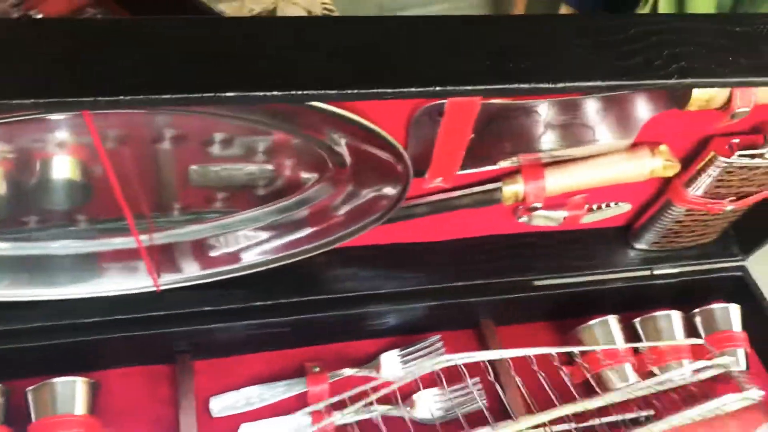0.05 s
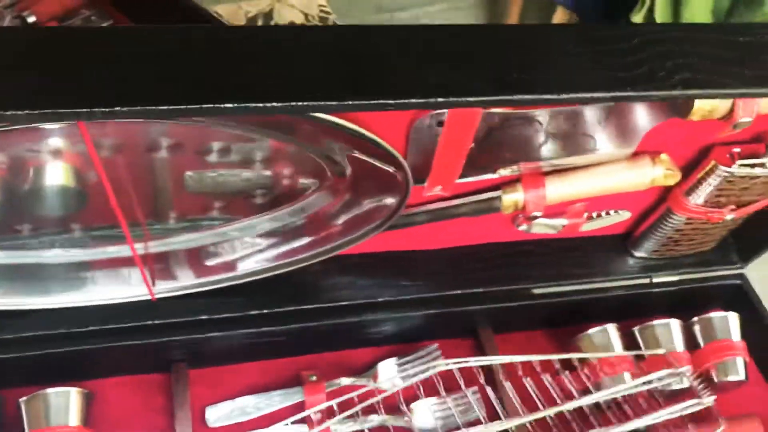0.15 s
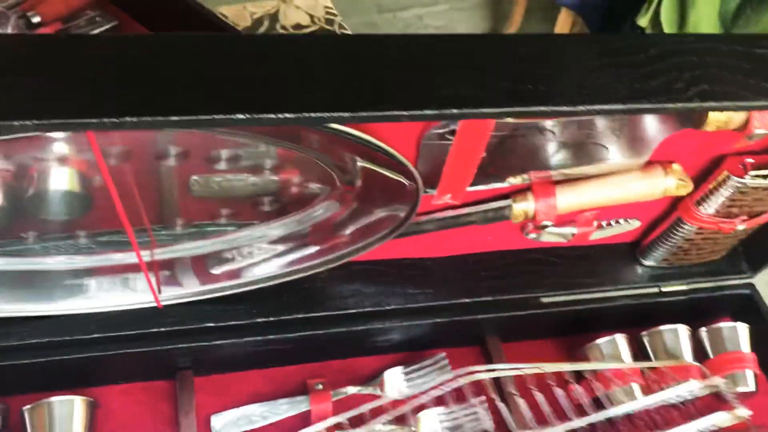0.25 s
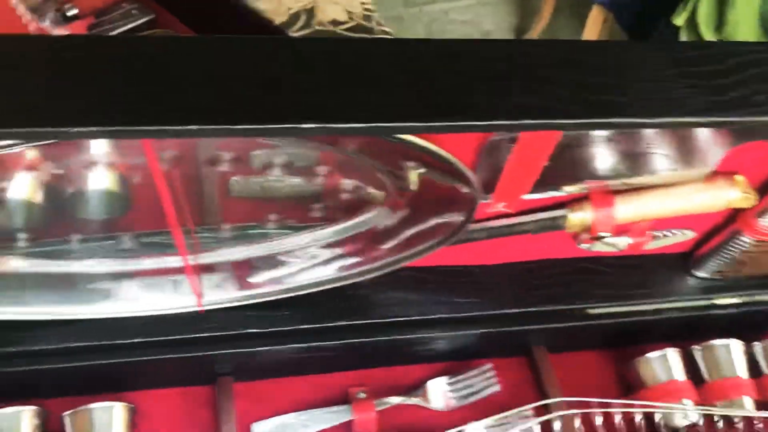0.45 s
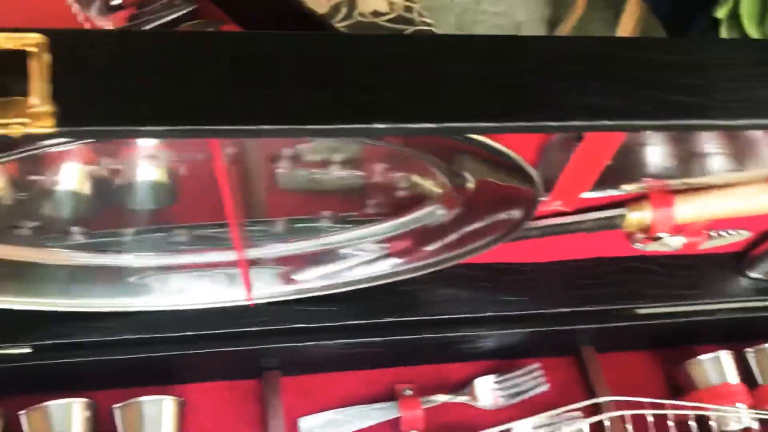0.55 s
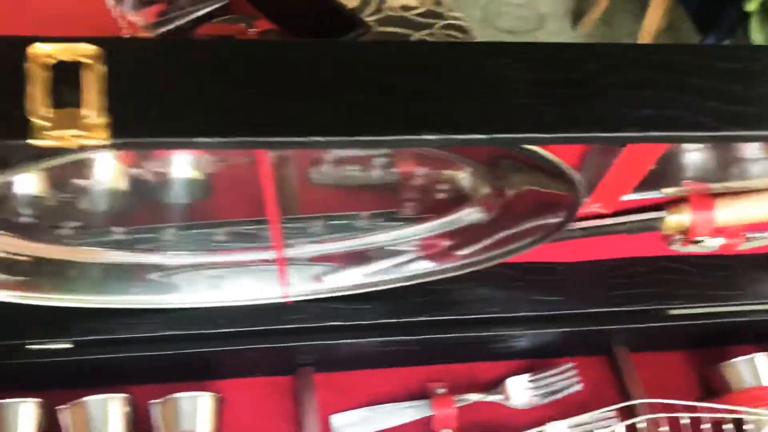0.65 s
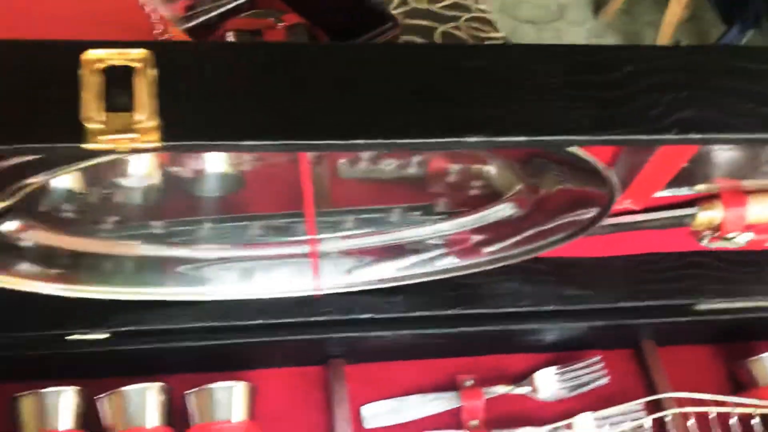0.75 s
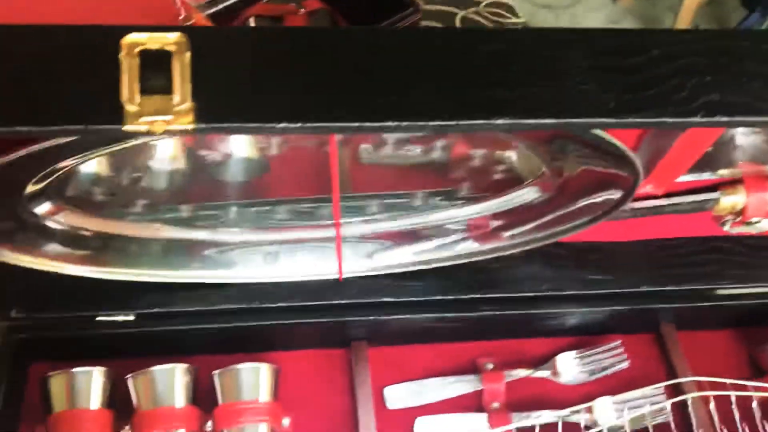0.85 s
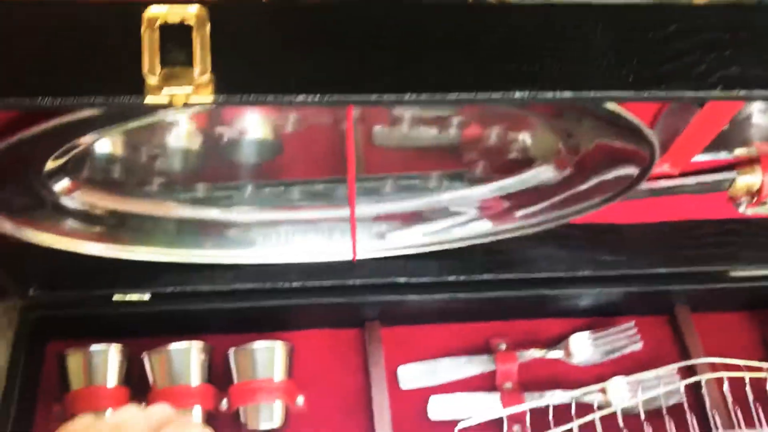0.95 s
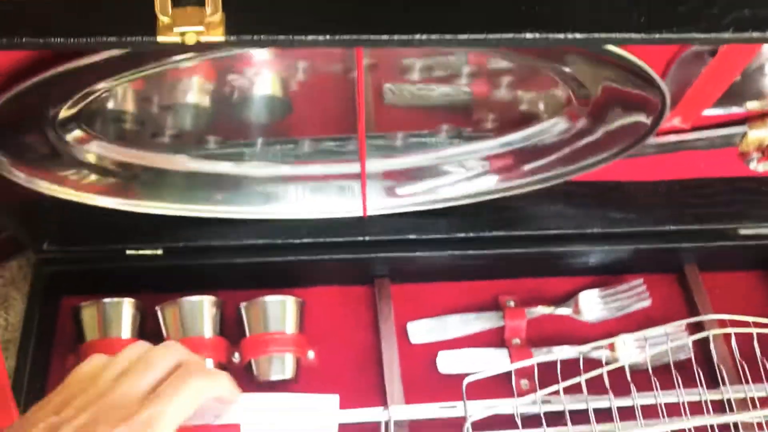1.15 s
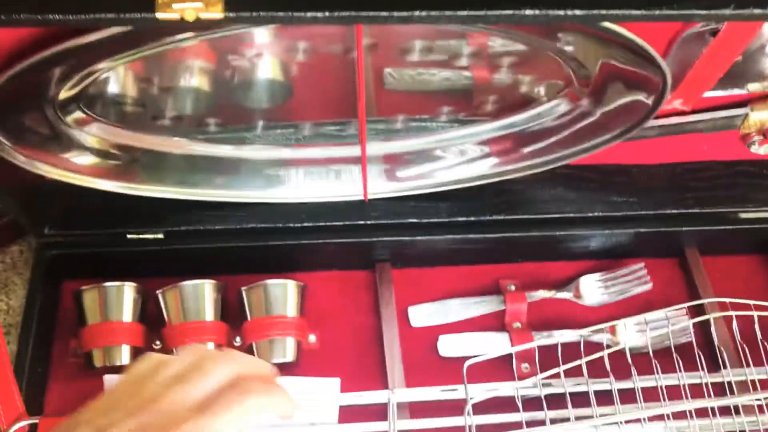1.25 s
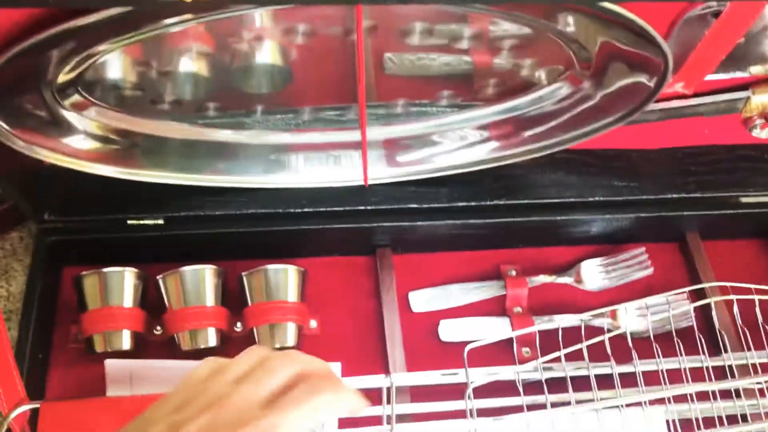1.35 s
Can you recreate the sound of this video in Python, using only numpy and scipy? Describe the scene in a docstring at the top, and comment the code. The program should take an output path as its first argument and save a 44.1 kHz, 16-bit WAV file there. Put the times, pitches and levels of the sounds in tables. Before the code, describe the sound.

Steel skewers clatter into a lined wooden case with a thud and a bright jingle. A wire grill lands right after and rattles among forks and cups, then light ticks and scrapes fade, close by in a small room.

```python
"""In a small room, close by, steel picnic ware is shifted in its lined wooden case.
Skewers drop with a thud and a bright jingle; a wire grill lands among forks and cups and chatters
to rest. Each impact excites the damped normal modes of the steel, and the case booms under the load.
A few dry ticks and light friction scrapes follow while one piece rings on over the room's low rumble."""
import sys
import numpy as np
from scipy import signal
from scipy.fft import rfft, irfft, next_fast_len
from scipy.io import wavfile
from scipy.ndimage import uniform_filter1d

SR = 44100
rng = np.random.default_rng(int(sys.argv[2]) if len(sys.argv) > 2 else 0)


def output_pcm(signal):
    """Save a mono or channel-first signal as 16-bit PCM at the path in sys.argv[1].

    Samples are clipped to [-1, 1] before scaling.
    """
    pcm = np.clip(np.atleast_2d(signal).T, -1, 1) * 32767
    wavfile.write(sys.argv[1], SR, np.round(pcm).astype(np.int16))


N = 61739


def skewers():
    """Impact excitation: dropped steel skewers strike one another and jingle in their bending modes."""
    # contacts: t/s, ring level/dB, crack level/dB, spectral tilt/(dB per octave)
    hits = [(.024, -67, -57, -5.5), (.041, -63, -51.5, 0.5), (.2462, -35.5, -30, 11.5),
            (.2515, -36.5, -28, -1.5), (.264, -46, -37, 5.5), (.2885, -36, -29.5, 3.5),
            (.296, -44.5, -46, -14), (.3265, -40.5, -31.5, 1), (.366, -50.5, -41, -11),
            (.411, -59.5, -41, 1)]
    # clear partials: f/Hz, relative level/dB, T60/s
    modes = [(1240, -12, .4), (1534, -5, .42), (1700, -7, .5), (1793, -2, .85), (1953, -3, .5),
             (2130, -5, .45), (3397, -4, .3), (3671, -5, .45), (4587, -5, .5), (5350, -5, .35),
             (6530, -8, .45), (8366, -9, .55), (11030, -5, .33), (11235, -1, .25), (14893, -5, .22),
             (15267, 1, .29), (15380, -3, .3)]
    # spectral envelope of the weaker partials and the cracks: f/Hz, level/dB
    colour = [(400, -43), (1000, -19), (1800, 4), (2700, -2.5), (3800, 5), (5300, 2.5), (7400, -5),
              (8400, -2.5), (10400, -8.5), (11400, -4), (14200, -4.5), (15400, -12.5)]
    return clatter(hits, modes, colour, t60=0.51, damping=0.11, clear_db=-4, count=520)


def grill():
    """Repeated impact: a wire grill rebounds, exciting its own modes and those of the pieces under it."""
    # contacts: t/s, ring level/dB, crack level/dB, spectral tilt/(dB per octave)
    hits = [(.4787, -38, -27.5, -2), (.4855, -32, -25, -2), (.493, -36, -25, 2), (.502, -39.5, -26.5, 4),
            (.524, -55.5, -31.5, 2), (.536, -38.5, -28, 2.5), (.5415, -35, -29, 2), (.556, -41, -30, -1),
            (.569, -40.5, -38.5, 0)]
    # clear partials: f/Hz, relative level/dB, T60/s
    modes = [(1610, -14, 1.2), (1836, -8, .6), (1955, -3, .3), (2093, -4, .3), (2099, -16, 2.1),
             (2254, -2, .35), (2537, -1, .33), (2649, -4, .45), (3312, -3, .33), (3472, -4, .4),
             (4257, -6, .3), (4840, -2, .25), (6705, -3, .5), (6891, -10, .5), (12265, -5, .22)]
    # spectral envelope of the weaker partials and the cracks: f/Hz, level/dB
    colour = [(200, -4), (400, -8.5), (700, 2), (1100, -4.5), (1500, -4.5), (2200, 1), (2950, -5.5),
              (3700, 2), (5400, -6.5), (6700, -6.5), (9000, -7.5), (15500, -11.5)]
    return clatter(hits, modes, colour, t60=0.34, damping=0.15, clear_db=-8.5, count=480)


def clatter(hits, modes, colour, t60, damping, clear_db, count):
    """Modal superposition: each contact sounds a crack, a few clear partials and many weaker ones."""
    lining_hz, detune_hz = 350, 5.1
    out = np.zeros(N)
    dense_hz = 450 + 15550 * ((np.arange(count) + rng.random(count)) / count) ** 1.4
    dense_t60 = t60 * (dense_hz / 4000) ** -damping  # higher modes die sooner
    dense_t60 *= dense_hz / (dense_hz + lining_hz)  # the lining damps the lowest ones
    dense_t60 *= np.exp(0.13 * rng.standard_normal(count))
    share = np.gradient(np.linspace(0, 1, count) ** 1.4) ** .5  # power in proportion to mode spacing
    mode_hz, mode_db, mode_t60 = np.array(modes).T
    body = steel_response(colour)
    phases = lambda size: np.exp(2j * np.pi * rng.random(size))
    # each contact rings a few Hz off pitch, so overlapping rings add evenly in loudness
    detuned = lambda hz: hz + detune_hz * rng.standard_normal(len(hz))
    for start, ring_db, crack_db, brightness in hits:
        tilt = lambda f: undb(brightness * np.log2((f + 100) / 4000))  # set by where the contact lands
        shape = lambda f: body(f) * tilt(f)
        dense = ring(detuned(dense_hz), phases(count) * share * shape(dense_hz), dense_t60)
        clear = ring(detuned(mode_hz), phases(len(modes)) * undb(mode_db) * tilt(mode_hz), mode_t60)
        crack = burst(lambda f: shape(f) * f / (f + 250), t60=.052)
        add(out, start, undb(ring_db) * (dense + undb(clear_db) * clear))
        add(out, start, undb(crack_db) * crack)
    return out


def steel_response(colour):
    """Mode clustering: alike pieces bunch their resonances, rippling a broad curve of gain against Hz."""
    spacing_hz, spread_db = 149.4, 2.8
    ripple_db = spread_db * np.clip(rng.standard_normal(size=400), -2, 1.5)
    ripple = lambda f: undb(np.interp(f / spacing_hz, np.arange(len(ripple_db)), ripple_db))
    return lambda f: colour_at(f, colour) * ripple(f)


def case():
    """Panel resonance: the wooden case booms under the load and knocks dully as the steel bounces."""
    # the case takes the weight: t/s, level/dB
    thumps = [(0.2451, -19.5), (.489, -28), (0.569, -41)]
    # modes of the case: f/Hz, relative level/dB, T60/s
    modes = [(78, -20.5, 0.096), (115.6, -0.5, .14), (207.6, -14.5, 0.147), (318, -8.5, 0.13),
             (478, -20.5, .13), (568, -19.5, 0.1), (677, -2, 0.052)]
    # steel on lined wood: t/s, level/dB, spectral tilt/(dB per octave)
    knocks = [(.081, -56, 0), (.245, -29, 3), (0.2528, -32.5, -0.5), (.261, -37, 4), (.271, -34, 4),
              (0.276, -36, -7), (.486, -38, -3.5), (0.492, -42.5, -12), (.502, -32.5, 2), (.511, -31.5, -2),
              (.541, -38.5, -2.5), (.568, -41, -1), (.61, -40.5, -7.5), (.704, -46.5, -5), (.728, -49, -8),
              (1.162, -57, -1.5)]
    # spectral envelope of a knock: f/Hz, level/dB
    colour = [(25, -37), (50, -19), (85, -1.5), (170, -2.5), (260, 1.5), (390, -15.5), (520, -1),
              (720, -8.5), (1100, -15.5), (2500, -27.5)]
    rise_s = 0.0079  # the case takes a moment to swing up
    out = np.zeros(N)
    hz, mode_db, t60 = np.array(modes).T
    boom = ring(hz, undb(mode_db), t60)
    boom *= 1 - np.exp(-np.arange(len(boom)) / SR / rise_s)
    for start, db in thumps:
        add(out, start, undb(db) * boom)
    for start, db, brightness in knocks:
        tilt = lambda f: undb(brightness * np.log2(np.clip(f, 60, 1200) / 300))
        knock = burst(lambda f: colour_at(f, colour) * tilt(f), t60=0.062)
        add(out, start, undb(db) * knock)
    return out


def ticks():
    """Heavy damping: pieces held tight give dry ticks, each with one broad resonance."""
    # contacts: t/s, level/dB, centre f/Hz, width/octaves, T60/s
    contacts = [(0.2536, -19.5, 4670, 0.25, 0.011), (.2895, -36.5, 4940, 0.54, 0.015),
                (.668, -31.5, 2970, 0.28, 0.011), (.668, -37, 1620, 1.35, 0.043),
                (.6955, -44, 3320, 0.45, 0.015), (.705, -45.5, 2060, 0.85, 0.018),
                (.728, -48.5, 1700, 0.57, .05), (0.7566, -51, 2960, 1, 0.014),
                (.8215, -52, 4600, 0.47, .03), (0.867, -55.5, 2900, 1.2, 0.043)]
    out = np.zeros(N)
    for start, db, hz, width, t60 in contacts:
        resonance = lambda f: 1 / (1 + (np.log2((f + 1) / hz) / width) ** 2) ** 2
        add(out, start, undb(db) * burst(resonance, t60))
    return out


def scrape():
    """Sliding friction: grainy noise is filtered by the resonances of the moving pieces."""
    # steel sliding on steel and lining: t/s, level/dB
    contour = [(0, -61), (.035, -62.5), (0.047, -54), (.065, -66), (.1, -62.5), (.135, -88), (.2, -77),
               (.232, -57), (.45, -59), (.7, -55), (.83, -57), (.875, -63), (.9, -74.5), (.98, -62.5),
               (1.03, -66), (1.11, -60.5), (1.18, -75.5), (1.4, -75.5)]
    # spectral envelope of the friction: f/Hz, level/dB
    colour = [(300, 2), (1000, -2), (2000, 0), (2600, 0), (3400, 4), (5000, -4.5), (6400, -1.5),
              (8000, -10), (13000, -10.5), (16000, -16)]
    times, db = np.array(contour).T
    envelope = undb(np.interp(np.arange(N) / SR, times, db))
    roughness = unit(uniform_filter1d(rng.standard_normal(N), size=90))
    grain = unit(np.exp(0.083 * roughness))
    return envelope * grain * noise(steel_response(colour))


def room(direct):
    """Reverberation: the furnished room adds a short diffuse tail that decays exponentially."""
    t60, gap_s, tail_db = 0.373, .005, -13
    t = np.arange(N // 2) / SR
    tail = rng.standard_normal(len(t)) * np.exp(-np.log(1000) * t / t60) * (t > gap_s)
    return direct + undb(tail_db) * signal.fftconvolve(direct, tail / np.linalg.norm(tail))[:N]


def rumble():
    """Ambient noise: the room's steady background has most of its power at low frequencies."""
    # spectral envelope of the rumble: f/Hz, level/dB
    colour = [(15, -31), (28, -15), (45, -1), (75, -2), (140, -6), (200, -7.5), (260, -14.5), (380, -18.5),
              (600, -22), (1100, -23.5), (1700, -30), (3700, -39.5), (8000, -43.5), (16000, -44)]
    return undb(-56.5) * noise(lambda f: colour_at(f, colour))


def ring(hz, gain, t60, size=250):
    """Free vibration: damped sinusoids, size**2 samples long, scaled to a starting rms of about 1."""
    pole = (2j * np.pi * hz - np.log(1000) / t60) / SR
    steps = np.arange(size)
    gain = gain / np.sqrt(np.sum(np.abs(gain) ** 2) / 2)
    block_starts = gain * np.exp(np.outer(steps * size, pole))
    within_block = np.exp(np.outer(pole, steps))
    return (block_starts @ within_block).imag.ravel()


def burst(gain_at, t60):
    """Exponential decay: coloured noise starts near rms 1 and falls 60 dB in t60 seconds."""
    x = noise(gain_at, size=8192)
    fade = np.exp(-np.log(1000) * np.arange(len(x)) / SR / t60)
    return x * fade * np.linalg.norm(fade) / np.linalg.norm(x * fade)


def noise(gain_at, size=N):
    """Spectral shaping: white noise is weighted by gain_at(Hz) and scaled to rms 1."""
    n = next_fast_len(size)
    hz = np.arange(n // 2 + 1) * SR / n
    spectrum = rfft(rng.standard_normal(n)) * gain_at(hz)
    return unit(irfft(spectrum, n)[:size])


def colour_at(hz, points):
    """Spectral envelope: gain of a (f/Hz, level/dB) curve on a log-frequency axis."""
    f, db = np.array(points).T
    return undb(np.interp(np.log(hz + 1), np.log(f), db))


def undb(db):
    """Level in decibels to amplitude ratio."""
    return 10 ** (np.asarray(db) / 20)


def unit(x):
    """Normalisation to rms 1."""
    return x / np.sqrt(np.mean(x ** 2))


def add(out, start_s, x):
    """Superposition of x on out from a given time."""
    i = int(start_s * SR)
    out[i:i + len(x)] += x[:N - i]


def scene():
    """Superposition: steel, case and handling sounds reverberate over the room's rumble."""
    direct = skewers() + grill() + case() + ticks() + scrape()
    return (room(direct) + rumble())[None]


def record(dry):
    """Band limiting: the recorder's elliptic low-pass cuts the top of the treble."""
    cutoff_hz = 15750
    return signal.sosfilt(signal.ellip(10, .2, 80, cutoff_hz, fs=SR, output="sos"), dry)


dry = scene()
out = record(dry)
output_pcm(out)
```